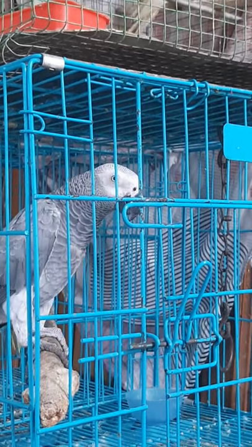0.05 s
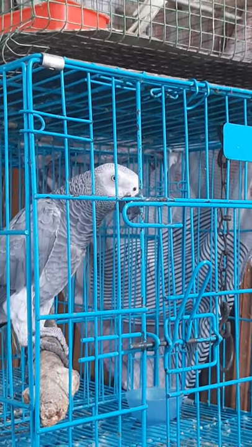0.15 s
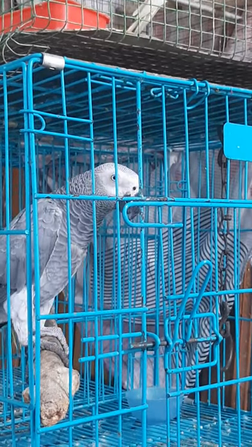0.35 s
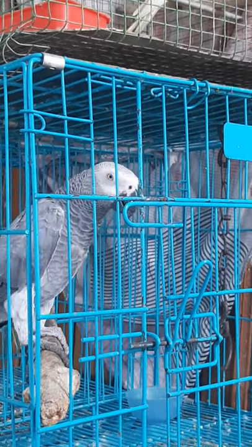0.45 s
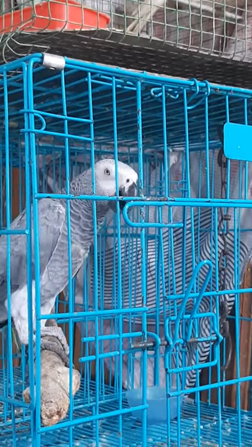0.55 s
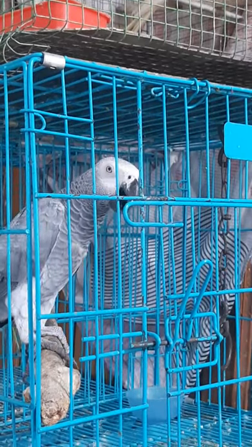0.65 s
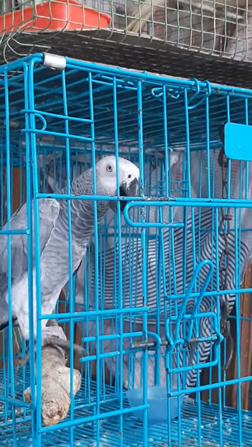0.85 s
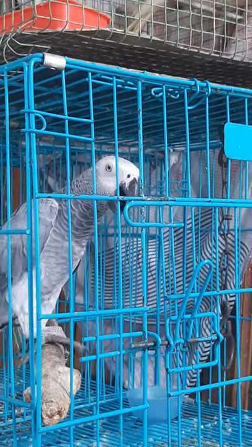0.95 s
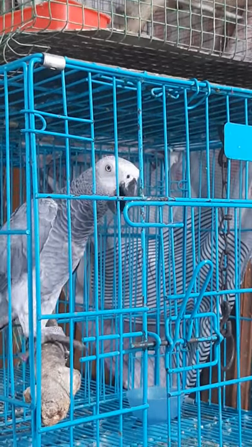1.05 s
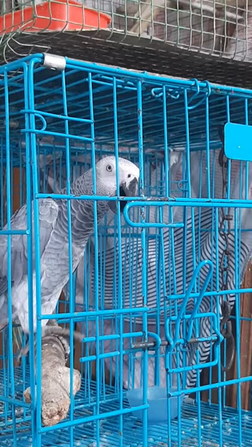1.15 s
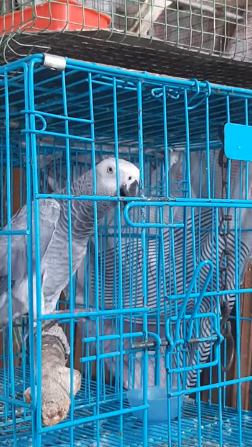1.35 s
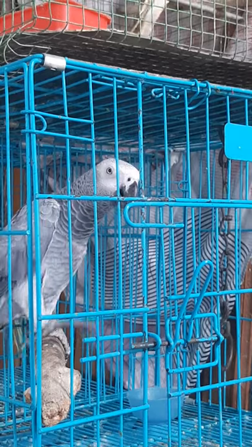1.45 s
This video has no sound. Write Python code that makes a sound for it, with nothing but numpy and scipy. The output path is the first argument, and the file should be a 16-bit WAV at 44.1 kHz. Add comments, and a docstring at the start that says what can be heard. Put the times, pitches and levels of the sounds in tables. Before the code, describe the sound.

A caged parrot gives one long, harsh squawk. It starts as a low growl, jumps to a caw, breaks into short squeals and ends in a raspy shriek. The small room rings briefly over a faint rumble.

```python
"""A grey parrot gives one long harsh squawk in a wire cage in a small room.
Uneven pulses and puffs of air from its syrinx are coloured by resonances of throat and cage.
The call starts as a low growl with thin ringing tones in it, jumps to a pitched caw, breaks into
short squeals and ends in an open-beaked rasp with a warbling shriek on top.
The room rings briefly over a faint rumble."""
import sys
import numpy as np
from scipy import signal
from scipy.fft import rfft, irfft
from scipy.io import wavfile

SR = 44100
rng = np.random.default_rng(int(sys.argv[2]) if len(sys.argv) > 2 else 0)


def transcribe(u):
    """Save the signal u as a 16-bit wav file named by the first command-line argument.

    u: samples, shape (n,) or (channels, n), limited to [-1, 1]; the rate is SR.
    q: integer samples, one column per channel.
    """
    v = np.clip(np.atleast_2d(u).T, -1, 1)
    q = np.round(v * 32767).astype(np.int16)
    wavfile.write(sys.argv[1], SR, q)


N = 66150
T, FREQS = np.arange(N) / SR, np.fft.rfftfreq(2 * N, 1 / SR)
JITTER_HZ, FLUTTER_HZ, WOBBLE_HZ = 350, 174.4, 44.98  # rates of random modulation
TONE_EDGE_S, CUTOFF_HZ = 0.0021, 15800

# Two thin ringing tones within the growl, followed by short gliding squeals:
# start_s, length_s, first_hz, middle_hz, last_hz, level_db, harmonic_number
TONES = [(0.127, .15, 1534, 1587, 1623, -37, 3), (0.361, 0.051, 2408, 2422, 2448, -23.5, 6),
         (0.57, 0.048, 3215, 3261, 3024, -18.5, 3), (0.59, 0.025, 5270, 5337, 5294, -16, 5),
         (0.62, 0.011, 4400, 4410, 4270, -19, 4), (0.626, .016, 4296, 3247, 2520, -14.5, 2),
         (0.651, .017, 5010, 3845, 2910, -16.5, 2), (0.665, 0.012, 2983, 3057, 2780, -14, 2),
         (0.698, .024, 2950, 3120, 3020, -13, 2), (.732, 0.011, 3344, 3128, 2990, -10.5, 2),
         (0.745, 0.018, 3008, 3122, 2850, -11, 2), (0.77, 0.016, 3082, 3093, 3420, -13, 3)]


def amp(db):
    """Decibels to amplitude ratio."""
    return 10 ** (np.asarray(db) / 20)


def unit(x):
    """Normalisation to rms 1."""
    return x / np.sqrt(np.mean(x ** 2) + 1e-20)


def response(points, hz=FREQS):
    """Interpolation of a table on a log-frequency axis."""
    f, value = np.transpose(points)
    return np.interp(np.log(hz + 1), np.log(f + 1), value)


def shape(x, gain):
    """Linear filtering: the spectrum is multiplied by a gain given at FREQS."""
    return irfft(rfft(x, 2 * N) * gain)[..., :N]


def wander(hz):
    """Band-pass noise of rms 1: random motion up to a rate, without slow drift."""
    ratio = (FREQS / hz) ** 2
    return unit(shape(rng.standard_normal(N), ratio / (ratio + .015) / (1 + ratio ** 2)))


def gate(times, edge_s=0.0088):
    """Trapezoidal envelope from the first time to the last."""
    return np.clip(np.minimum(T - times[0], times[-1] - T) / edge_s, 0, 1)


def rumble():
    """Partly coherent noise: a faint rumble and hiss, mostly common to both sides."""
    # Background spectrum: frequency_hz, relative_density_db
    spectrum = [(25, -28), (45, -24), (65, -3.5), (95, 0), (150, -3.5), (220, -5), (320, -10), (500, -10),
                (1000, -14.5), (2000, -16.5), (3400, -26), (8000, -32), (11000, -32), (15000, -30)]
    noise = rng.standard_normal(N) + 0.46 * rng.standard_normal((2, N))
    return amp(-49.5) * unit(shape(noise, amp(response(spectrum))))


def register(contour, resonances, wobble, air, flutter_db, doubling):
    """Source-filter model: uneven syrinx pulses and puffs of air excite resonances of throat and cage."""
    times, hz, db, jitter = np.transpose(contour)
    deviation = np.interp(T, times, jitter) * (wander(JITTER_HZ) + wobble * wander(WOBBLE_HZ))
    cycles = np.cumsum(np.interp(T, times, hz) * (1 + deviation)) / SR
    spread_rad = .45  # quadratic phase smears each pulse over its cycle
    harmonics = range(1, int(CUTOFF_HZ / hz.mean()))
    pulses = sum(np.cos(2 * np.pi * k * cycles + spread_rad * k * k) for k in harmonics)
    pulses *= 1 + doubling * np.cos(np.pi * cycles)  # period doubling: strong and weak alternate
    puffs = (0.46 + np.exp(-(cycles % 1) / 0.54)) * rng.standard_normal(N)
    drive = (unit(pulses) + air * unit(puffs)) * amp(flutter_db * wander(FLUTTER_HZ))
    voice = shape(drive, amp(response(resonances)))
    rms = np.sqrt(np.average(voice ** 2, weights=gate(times)))
    return voice / rms * gate(times) * amp(np.interp(T, times, db))


def growl():
    """Pitch jitter roughens a low pulse train that rises and swells."""
    # Syrinx motion: time_s, pitch_hz, level_db, jitter_ratio
    contour = [(.122, 259.4, -55, .11), (.152, 265.5, -33, .1), (.22, 266, -26.5, 0.0798),
               (.265, 277.4, -23.5, 0.028), (.295, 323.5, -19, 0.035), (.325, 394.7, -18.5, 0.029),
               (.37, 402.4, -20, 0.007), (.41, 409.7, -18.5, 0.011), (.445, 431.5, -15, 0.036)]
    # Resonances of throat and cage: frequency_hz, gain_db
    resonances = [(200, -30), (400, -12.5), (520, -14), (690, -7.5), (850, -7), (1200, -1.5), (1450, -4),
                  (1600, 6.5), (1800, -1.5), (2000, 0), (2200, -21), (2430, -1), (2800, -9), (3050, 1),
                  (3230, 4), (3500, -7.5), (5300, -7), (7700, -22), (8600, -32.5), (15000, -40.5)]
    return register(contour, resonances, wobble=.6, air=.42, flutter_db=2.2, doubling=.2)


def rings_and_squeals():
    """One dominant harmonic with weak neighbours: thin ringing in the growl, then gliding squeals."""
    out, waver = np.zeros(N), 1 + 0.0116 * wander(JITTER_HZ)
    for start, length, first, middle, last, db, harmonic in TONES:
        progress = np.clip((T - start) / length, 0, 1)
        arch = (middle - (first + last) / 2) * np.sin(np.pi * progress)
        hz = first + (last - first) * progress + arch
        phase = 2 * np.pi * np.cumsum(hz * waver) / SR / harmonic
        tone = sum(np.sin(k * phase) * amp(0 if k == harmonic else -13.5)
                   for k in range(1, harmonic + 2))
        out += amp(db) * unit(tone) * gate((start, start + length), TONE_EDGE_S)
    return out


def caw():
    """Period doubling puts subharmonics between the partials of a nearly level pitch."""
    # Syrinx motion: time_s, pitch_hz, level_db, jitter_ratio
    contour = [(.425, 622.8, -16, 0.0356), (.442, 643, -16.5, 0.027), (.462, 650, -16.5, 0.04),
               (.482, 655.7, -16.5, 0.015), (.50, 644, -14, 0.03), (.525, 670.6, -14.5, 0.026),
               (.555, 648.6, -15, 0.046), (.578, 639.8, -20, 0.081), (.60, 681, -17, 0.13)]
    # Resonances of throat and cage: frequency_hz, gain_db
    resonances = [(200, -36), (330, -21.5), (480, -13.5), (650, -10.5), (950, -11), (1300, 0), (1650, 3.5),
                  (1950, 1), (2250, -11), (2600, -0.5), (2950, -8.5), (3250, 1.5), (3600, -10.5),
                  (5200, -10.5), (7700, -22), (9000, -36), (15000, -44)]
    return register(contour, resonances, wobble=.6, air=.4, flutter_db=2.5, doubling=.5)


def voice_break():
    """A register jump to a high, rough voice, which gives way while a squeal lasts."""
    # Syrinx motion: time_s, pitch_hz, level_db, jitter_ratio
    contour = [(.575, 1056, -20, 0.038), (.60, 1068, -18.5, 0.017), (.618, 1059, -15, 0.042),
               (.635, 1120, -21.5, 0.087), (.66, 1141, -14.5, 0.0828), (.695, 1160, -18.5, 0.055),
               (.73, 1129, -18, 0.058), (.755, 993, -20.5, 0.056), (.785, 928, -16, 0.078)]
    # Resonances of throat and cage: frequency_hz, gain_db
    resonances = [(400, -57), (850, -30), (1100, -13), (1500, -9.5), (1900, -13.5), (2600, -2.5),
                  (3150, -3), (4000, -8.5), (5200, -10.5), (7700, -16.5), (9000, -32), (15000, -33.5)]
    voice = register(contour, resonances, wobble=.6, air=.7, flutter_db=3, doubling=.5)
    tone_on = sum(gate((start, start + length), TONE_EDGE_S) for start, length, *_ in TONES)
    return voice * amp(-6.5 * np.minimum(tone_on, 1))


def rasp():
    """Deep jitter broadens the falling harmonics into an open-beaked rasp."""
    # Syrinx motion: time_s, pitch_hz, level_db, jitter_ratio
    contour = [(.765, 950, -24, 0.0801), (.80, 819.8, -17.5, .14), (.835, 700.3, -14.5, .16),
               (.89, 665.5, -18, 0.1311), (.96, 679.3, -17.5, 0.1103), (1.03, 670.4, -16.5, .11),
               (1.095, 662.5, -15.5, 0.1006), (1.175, 649.6, -18, .11), (1.21, 638.8, -22, .11),
               (1.24, 625, -32, 0.12)]
    # Resonances of throat and cage: frequency_hz, gain_db
    resonances = [(250, -31.5), (450, -25.5), (600, -16.5), (730, -11.5), (900, -13.5), (1130, -11.5),
                  (1300, -2.5), (1500, -7), (2150, -7.5), (2660, 3.5), (2900, -2), (3400, 2.5),
                  (4100, -9.5), (5100, -2), (6200, -10), (7600, -9.5), (8700, -32), (11000, -26.5),
                  (15000, -30.5)]
    return register(contour, resonances, wobble=.7, air=.7, flutter_db=3, doubling=.3)


def shriek():
    """Random frequency and amplitude modulation make a sinking tone warble over the rasp."""
    # Path of the tone: time_s, pitch_hz, level_db
    contour = [(0.774, 3200, -16), (.80, 3200, -19.5), (0.829, 3100, -19), (.88, 3050, -24),
               (0.971, 2850, -19.5), (1.03, 2713, -24), (1.10, 2680, -21.5), (1.179, 2620, -27),
               (1.23, 2550, -35)]
    times, hz, db = np.transpose(contour)
    cycles = np.cumsum(np.interp(T, times, hz) * (1 + 0.093 * wander(FLUTTER_HZ))) / SR
    tone = np.sin(2 * np.pi * cycles) * amp(3.5 * wander(FLUTTER_HZ))
    return unit(tone) * gate(times) * amp(np.interp(T, times, db))


def room(voice):
    """Reverberation: early reflections and a diffuse tail follow the direct sound at two microphones."""
    # Reverberation time: frequency_hz, t60_s
    decay = [(200, 0.83), (1000, .6), (2500, 0.54), (5000, 0.46), (8000, 0.49), (15000, 0.28)]
    # Phase of the direct sound, left ahead of right: frequency_hz, lead_rad
    left_lead = [(0, 12.5), (860, -1.3), (2670, -6.0), (4310, -4), (6120, 3.34), (6980, 9.5), (8790, 5.5),
                 (11800, 15.5), (12800, 8.5), (14000, 8), (14500, 5), (15300, 6.7)]
    taps = rng.choice([-1., 1.], (2, 2, N)) * (rng.random((2, 2, N)) < 4000 / SR)  # 4000 a second
    early = taps[0] * np.exp(-T / 0.013) * (T > .001)
    hz, t, bands = signal.stft(taps[1] * (T > .008), SR, nperseg=256)
    bands *= amp(-60 * t / response(decay, hz)[:, None])
    tail = signal.istft(bands, SR, nperseg=256)[1][:, :N]
    echoes = sum(amp(db) * part / np.linalg.norm(part, axis=1, keepdims=True)
                 for part, db in ((early, -1), (tail, -4.5)))
    direct = np.array([shape(voice, np.exp(1j * response(left_lead))), voice])
    return direct + signal.fftconvolve(voice[None], echoes, axes=1)[:, :N]


def scene():
    """Superposition of the call's parts; unequal channel levels place the bird a little to the right."""
    # Colour of the voice on each side: frequency_hz, gain_db
    left = [(400, -3.5), (1200, -1.5), (2400, -4.5), (3200, -6), (5000, -4), (9000, -1.5), (15000, -1.5)]
    right = [(400, -1.8), (1200, 1.04), (2400, 1.6), (3200, 0.067), (5000, 1.73), (9000, -0.15),
             (15000, -0.49)]
    voice = growl() + caw() + voice_break() + rasp() + rings_and_squeals() + shriek()
    return shape(room(voice), amp([response(left), response(right)])) + rumble()


def record(dry):
    """Soft saturation rounds the peaks; a narrow treble notch and a low-pass filter follow."""
    ceiling, notch_hz, width_hz = .92, 8540, 390
    rounded = dry / (1 + (dry / ceiling) ** 12) ** (1 / 12)
    notched = shape(rounded, amp(-16.5 * np.exp(-((FREQS - notch_hz) / width_hz) ** 2)))
    low_pass = signal.firwin(511, CUTOFF_HZ, window=("kaiser", 9), fs=SR)
    return signal.oaconvolve(notched, low_pass[None], "same")


dry = scene()
out = record(dry)
transcribe(out)
```